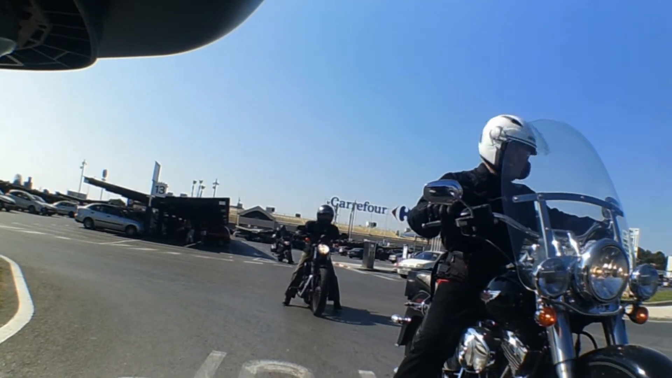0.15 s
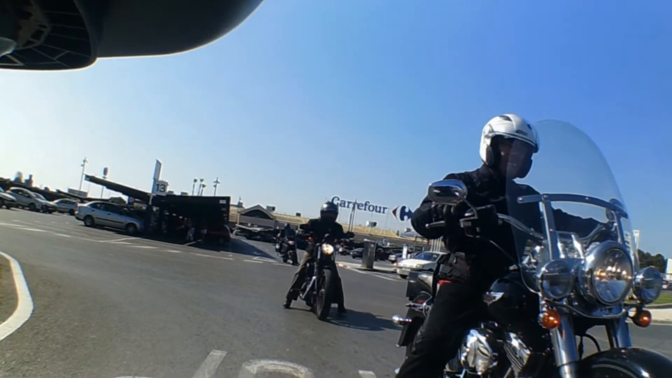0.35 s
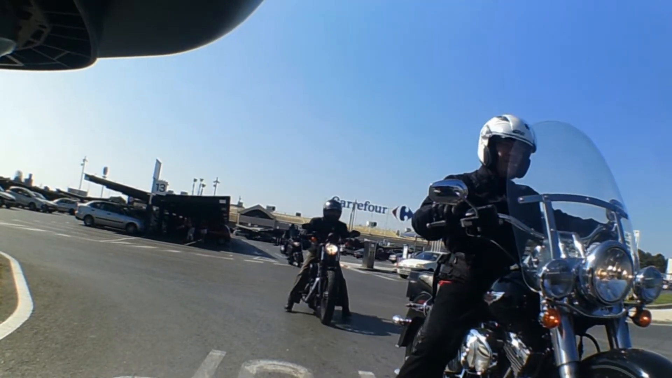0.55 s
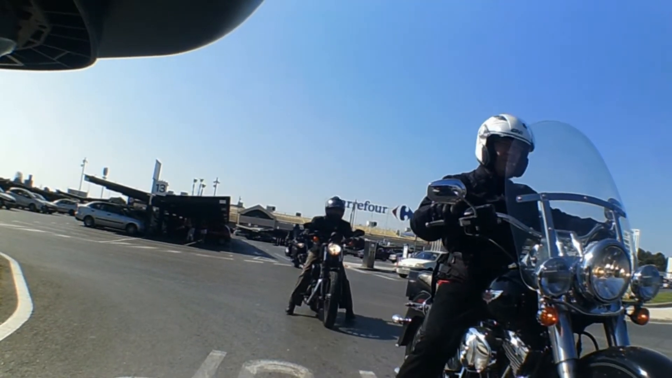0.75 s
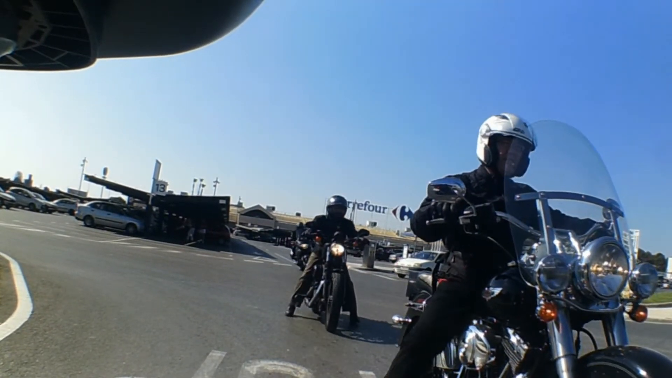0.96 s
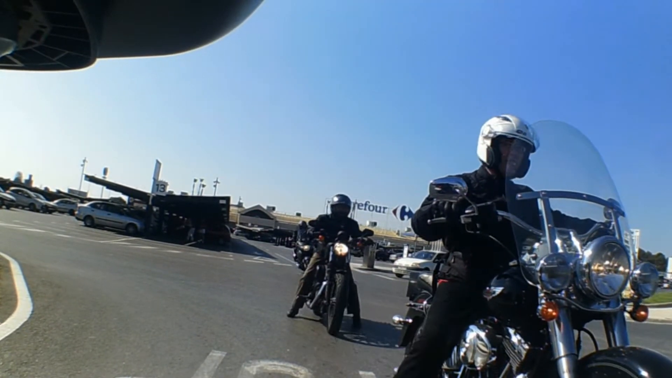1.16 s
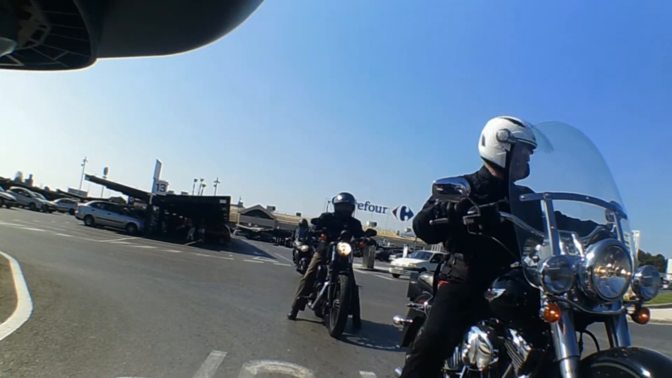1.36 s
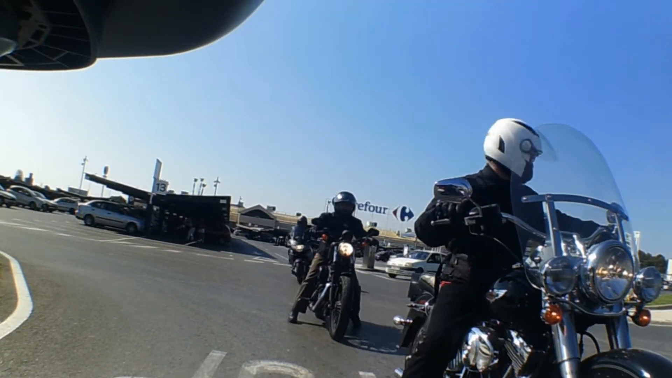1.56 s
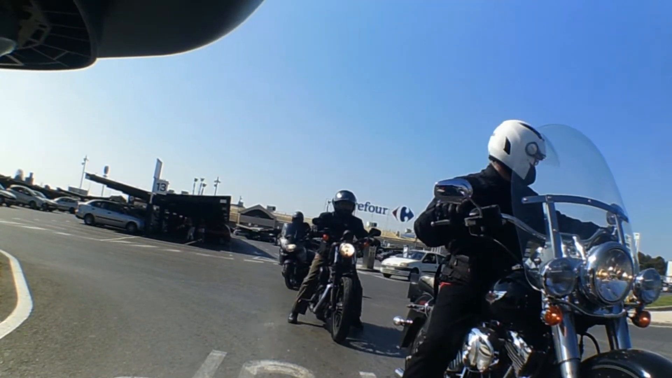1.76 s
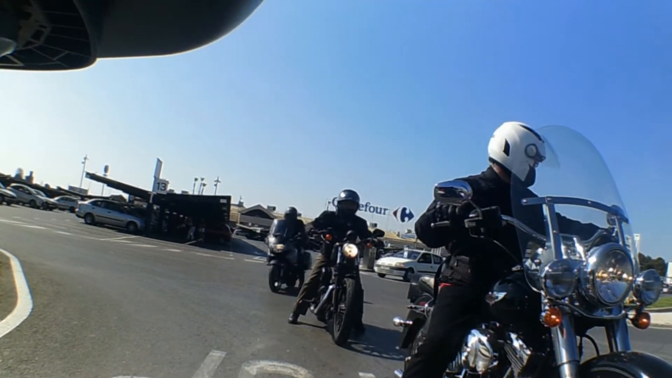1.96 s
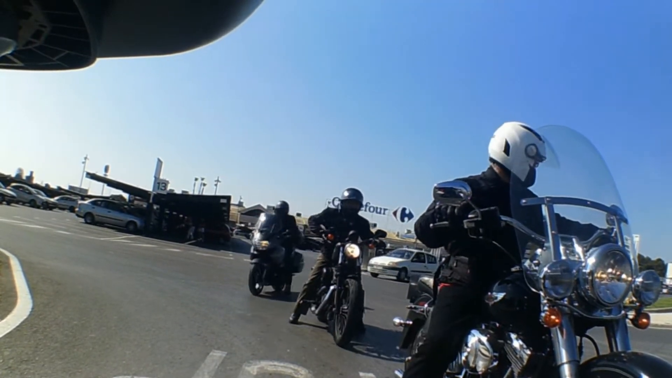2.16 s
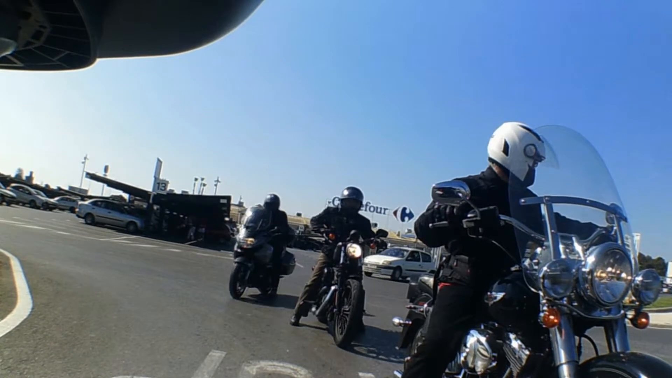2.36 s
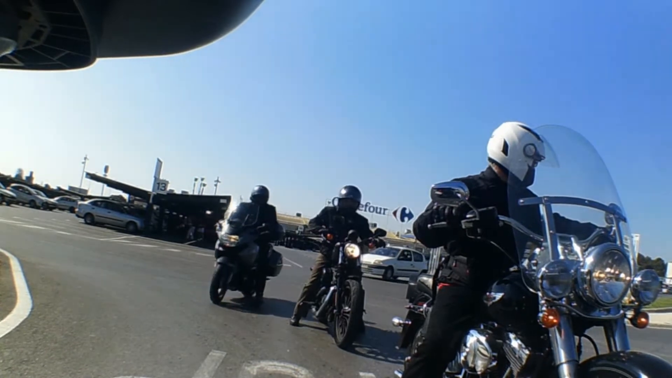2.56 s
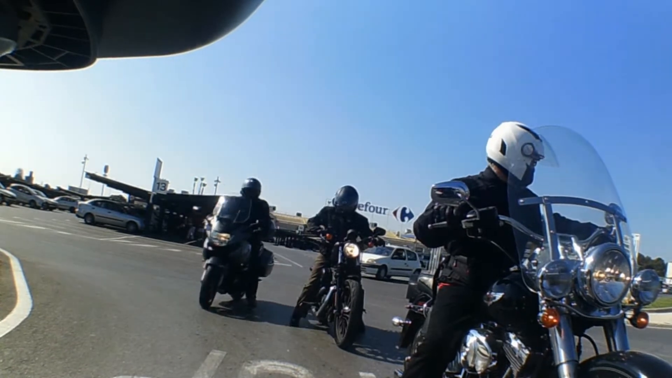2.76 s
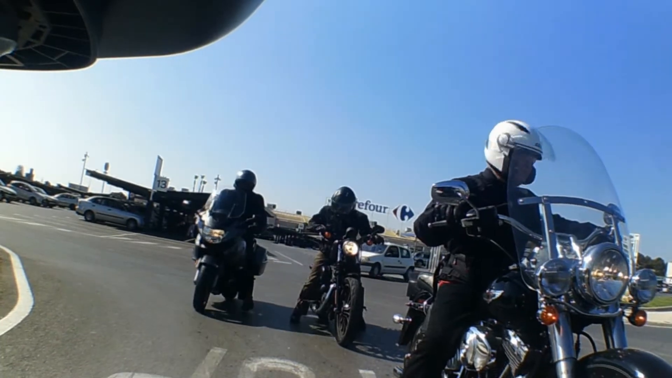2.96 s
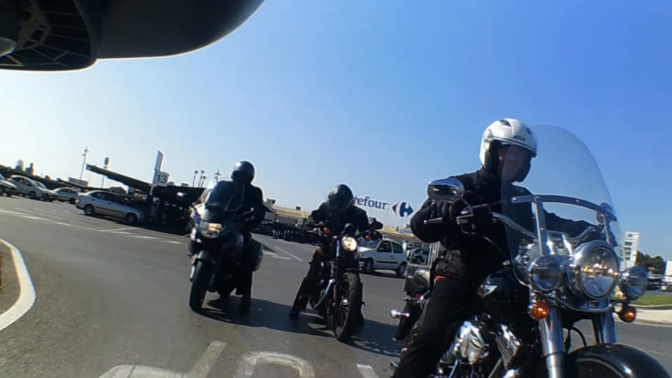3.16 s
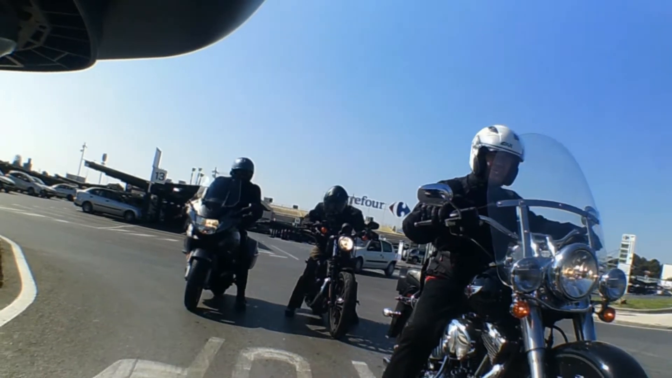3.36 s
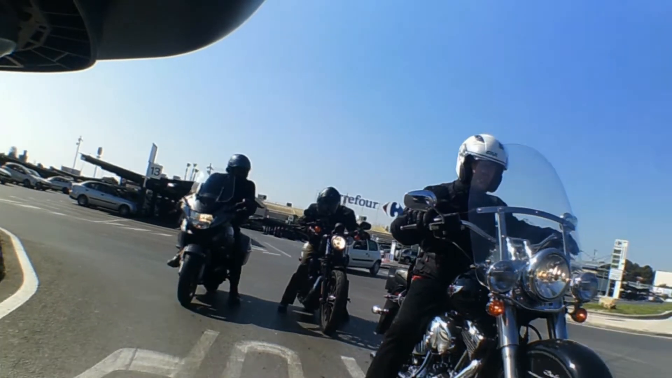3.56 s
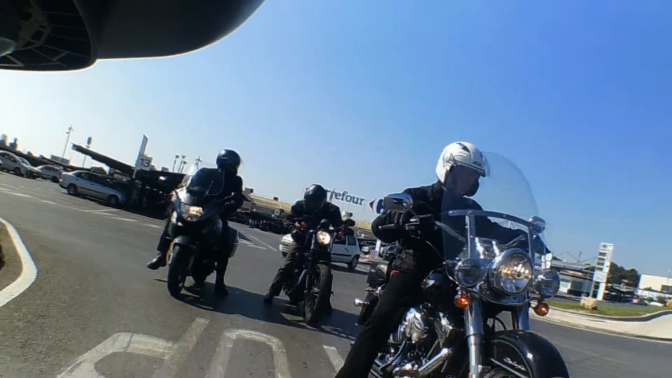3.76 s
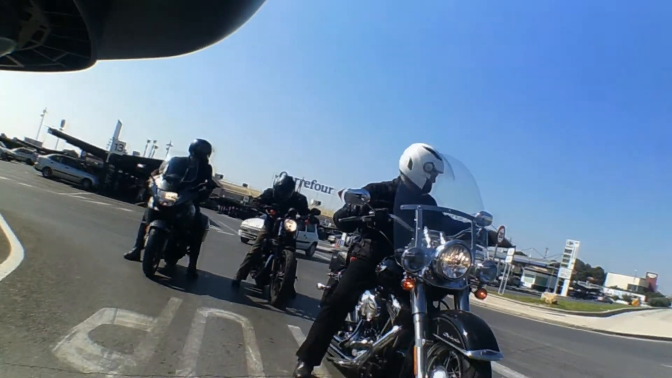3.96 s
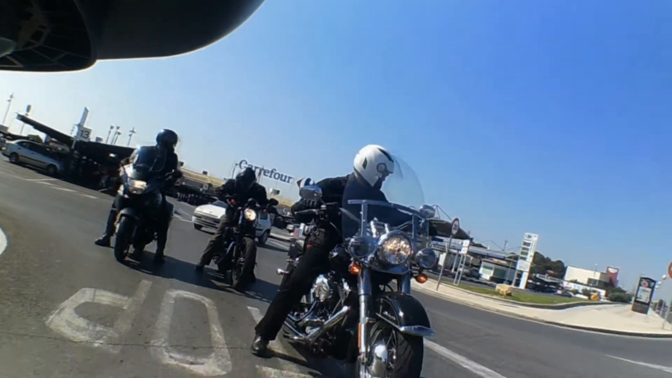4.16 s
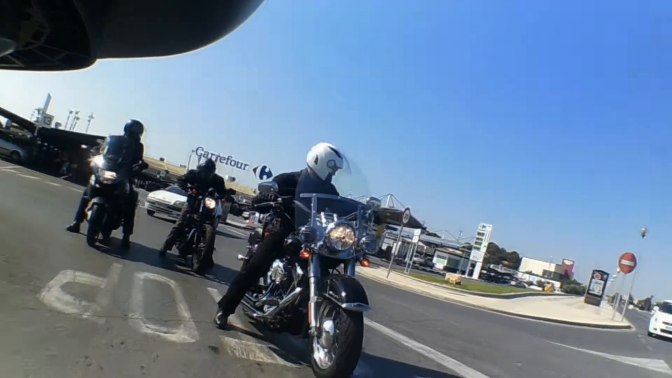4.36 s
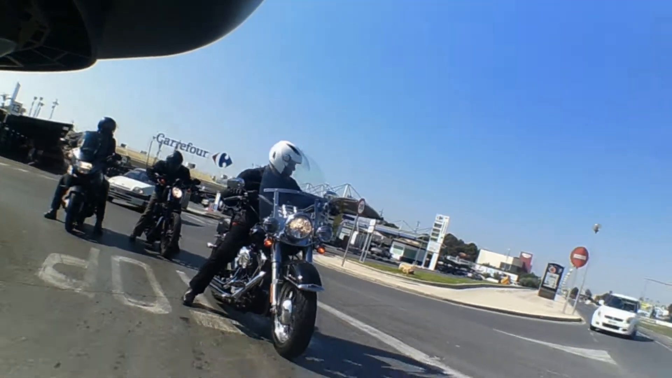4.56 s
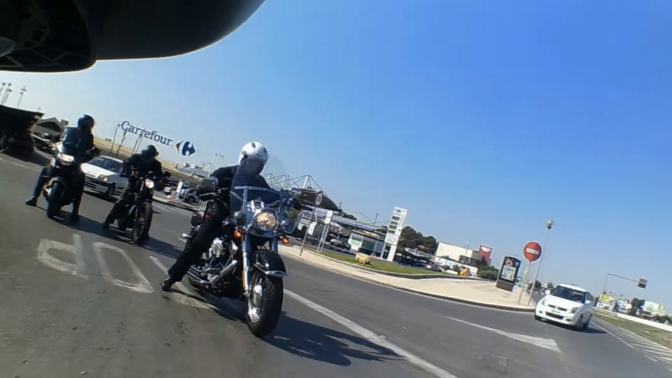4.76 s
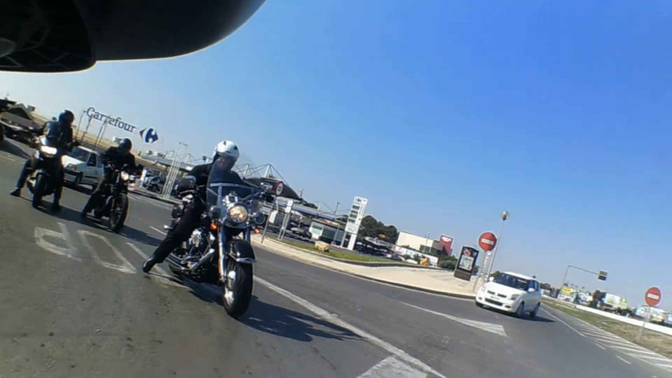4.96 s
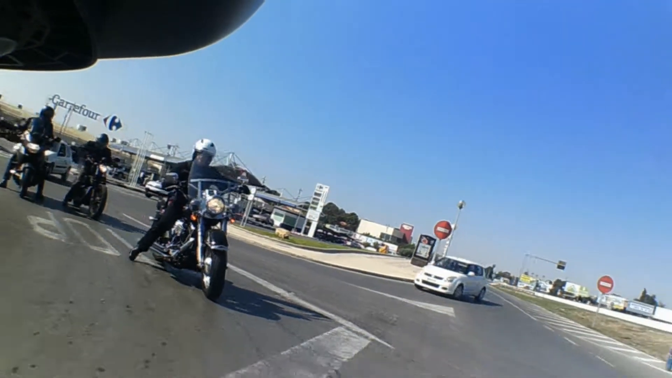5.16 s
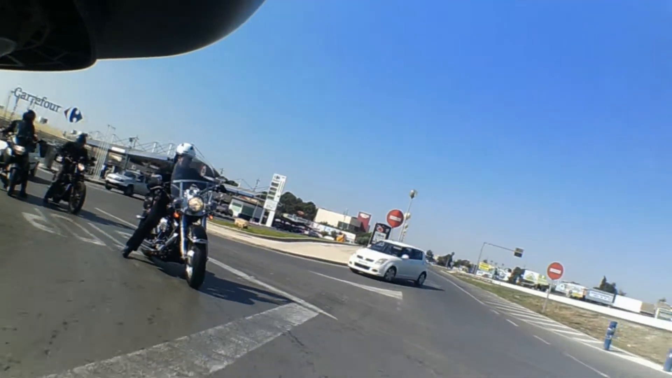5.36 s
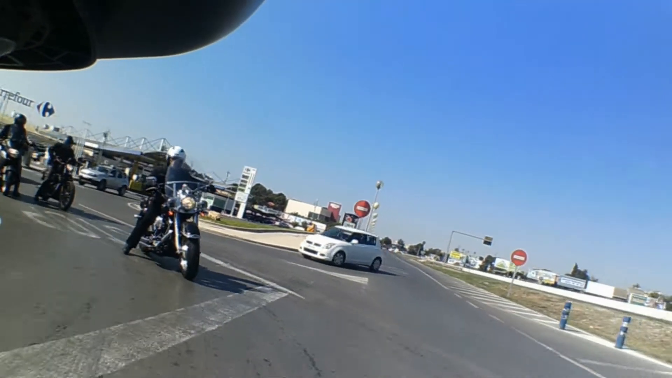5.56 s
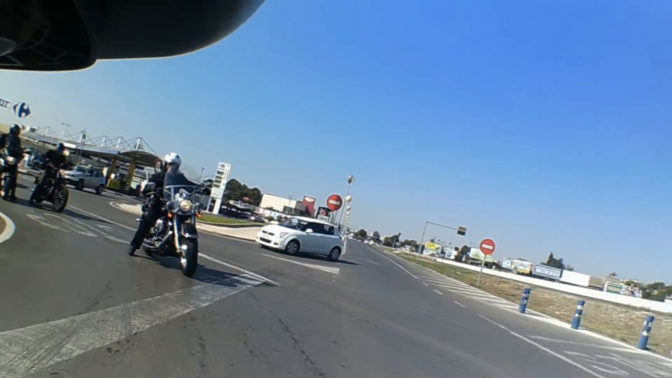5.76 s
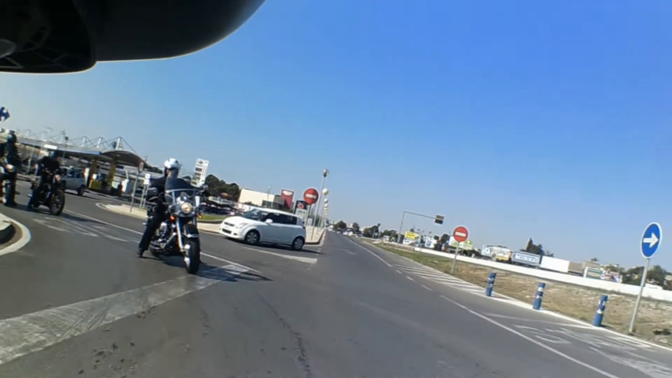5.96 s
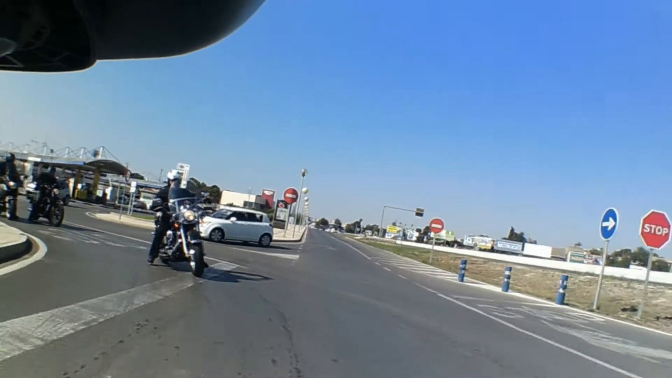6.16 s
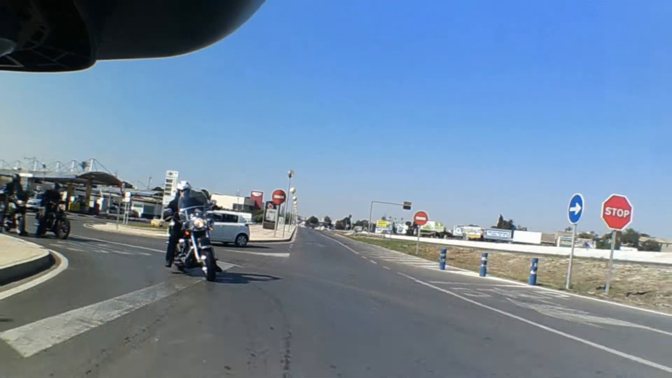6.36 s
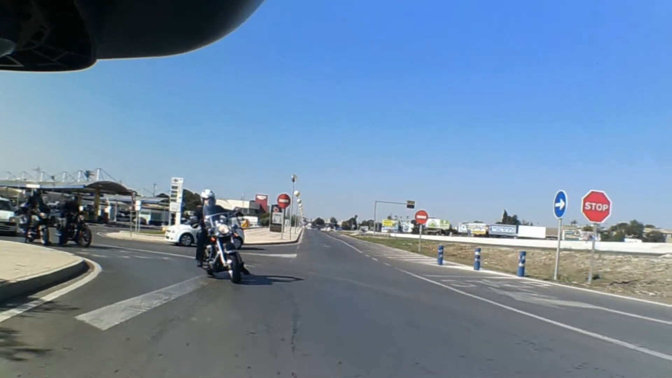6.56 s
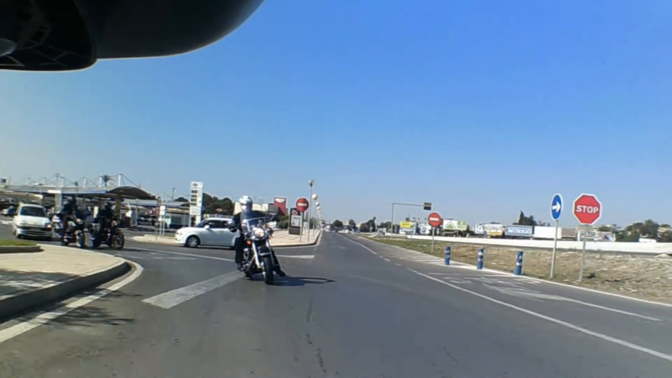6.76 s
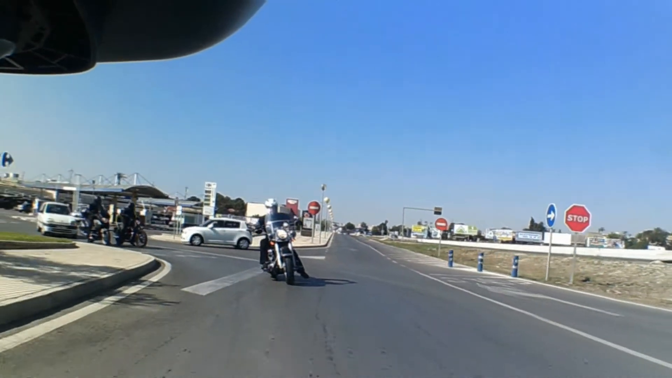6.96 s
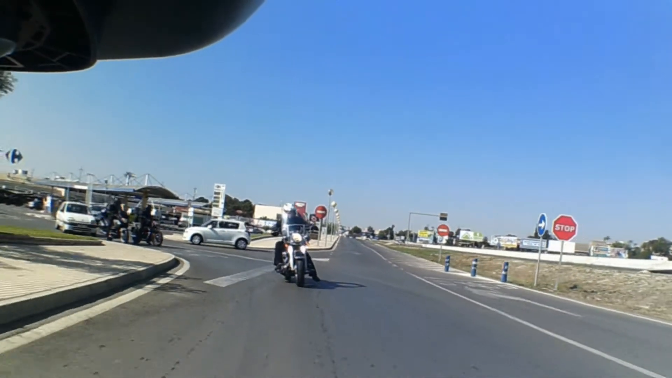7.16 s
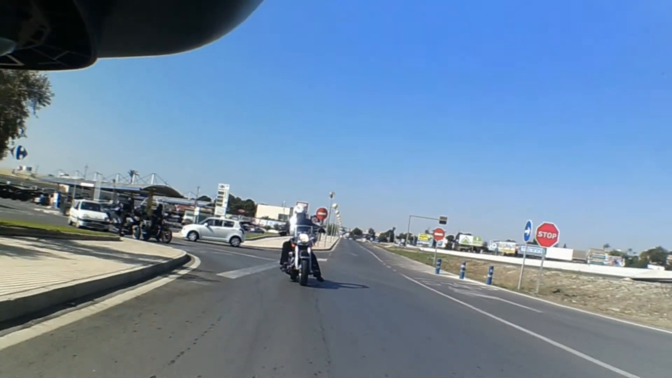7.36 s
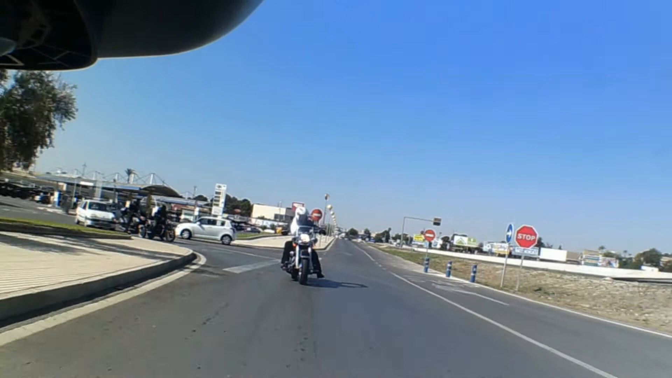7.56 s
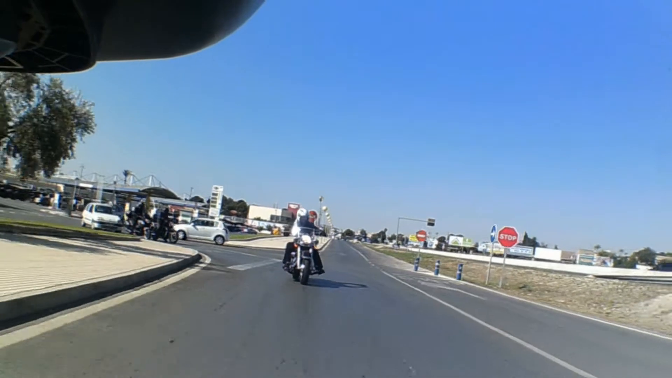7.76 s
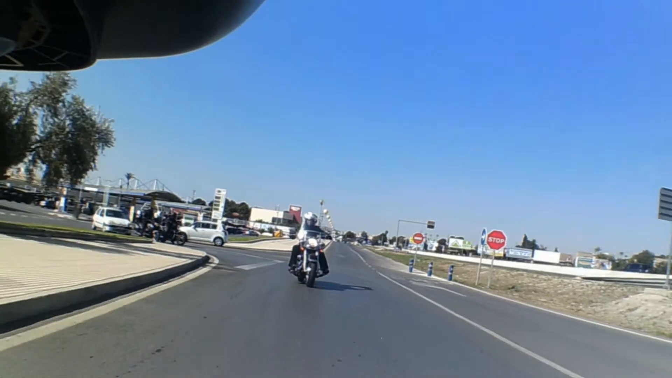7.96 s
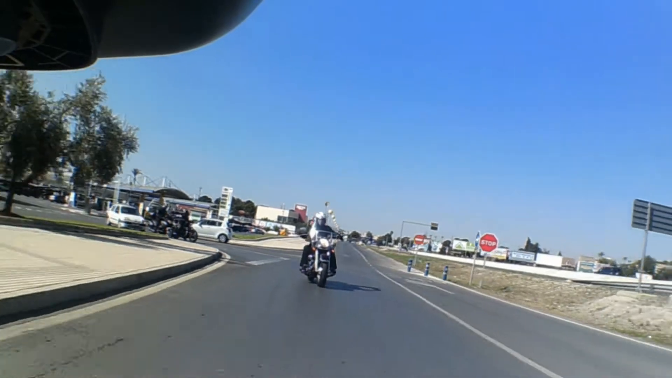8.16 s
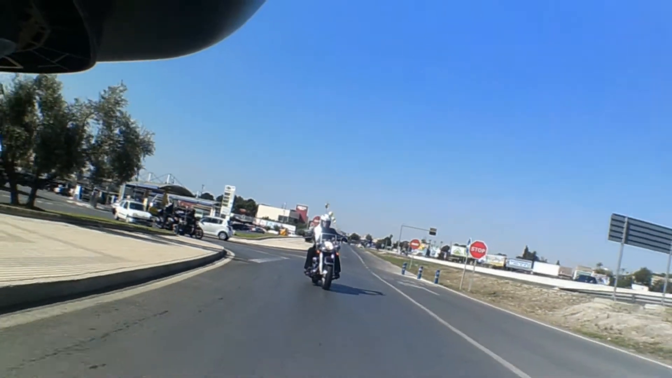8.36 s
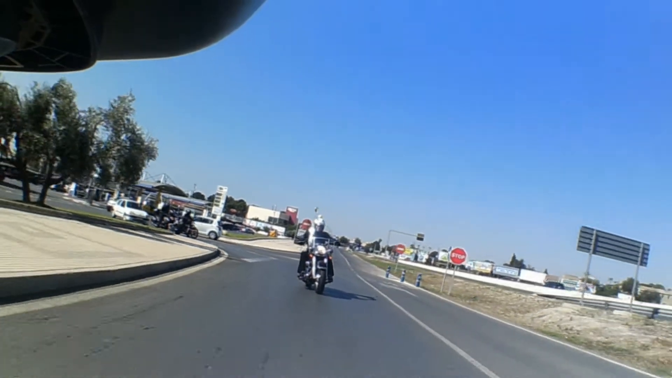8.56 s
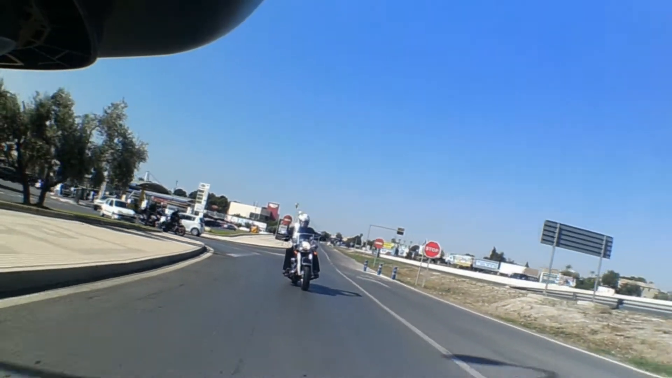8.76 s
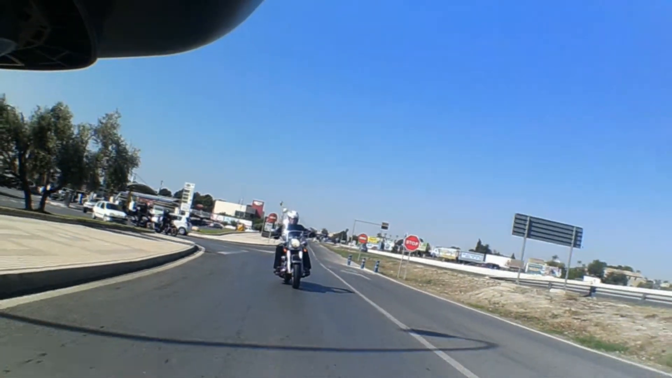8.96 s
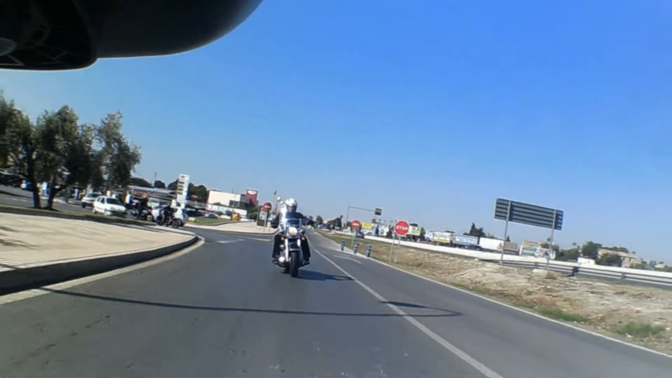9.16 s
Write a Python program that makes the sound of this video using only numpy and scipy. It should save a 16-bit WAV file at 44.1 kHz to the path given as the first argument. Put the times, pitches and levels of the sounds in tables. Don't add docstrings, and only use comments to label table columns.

```python
import sys
import numpy as np
from scipy import signal
from scipy.fft import rfft, irfft, next_fast_len
from scipy.io import wavfile
from scipy.ndimage import uniform_filter1d, map_coordinates

SR = 44100
rng = np.random.default_rng(int(sys.argv[2]) if len(sys.argv) > 2 else 0)


def log_audio(samples):
    frames = np.atleast_2d(samples).T
    limited = np.clip(frames, -1, 1)
    pcm = np.round(limited * 32767).astype(np.int16)
    wavfile.write(sys.argv[1], SR, pcm)


def how_loud(loudness_db):
    steps = np.asarray(loudness_db, float) / 20
    return 10 ** steps


N = 410130

WAITING_CYCLES_PER_S, WAITING_DB, WAITING_M = 8.05, -36, 2.4
LEAVE_S, LEAVE_M_PER_S = 3.2, 6
# time in [s], engine cycles per second in [1/s], level in [dB]
FOLLOWING = [(2.7, 9.9, -36), (3.3, 13.4, -27.5), (3.9, 12.6, -23.5), (4.2, 12.9, -23.5),
             (4.78, 14.6, -22.5), (5.05, 15.3, -25), (5.48, 16.6, -25.5), (5.7, 14.4, -25),
             (6.65, 12.6, -36), (7.2, 12.7, -31.5), (9.03, 20.3, -27.5), (9.3, 21, -33)]
# centre in [Hz], width in [Hz], level in [dB]
FAR_PIPE = [(90, 24, 0), (170, 35, -5), (290, 45, -13)]
# frequency in [Hz], level in [dB]
FAR_WALL = [(15, -34), (60, -18), (700, -30), (3000, -55)]

# time in [s], firings per second in [1/s]
SPEED = [(2.65, 19.5), (3.05, 32.43), (3.3, 29.76), (3.9, 26.93), (4.4, 22.36), (4.7, 21.29), (4.9, 22.34),
         (5.5, 28.97), (5.9, 32.5), (6.3, 35.84), (6.9, 39.45), (7.51, 43.2), (7.8, 29.49), (8.11, 22.13),
         (8.3, 20.6), (8.75, 19.9), (9.12, 33.18), (9.3, 32.52)]
# time in [s], exhaust level above idle in [dB]
THROTTLE = [(2.7, 4), (2.85, 4.5), (3.3, 5), (4.2, 7.5), (5.3, 8), (5.65, 5.5), (6.4, 9.5), (7.7, 6.5),
            (8.13, 1.5), (8.8, 3.7), (9.17, 5.5)]
IDLE_PER_S, IDLE_EXHAUST_DB = 20.2, -28.5
PIPE_LAG_S = .033
FIRING_TURN = .72
# centre in [Hz], width in [Hz], level in [dB]
PIPE = [(74, 20, 0), (118, 18, -8), (255, 40, -18), (320, 30, -19), (440, 50, -23), (540, 60, -23)]
# frequency in [Hz], level in [dB]
PIPE_WALL = [(15, -30), (40, -26), (100, -17), (180, -34), (700, -38), (3000, -70)]
# frequency in [Hz], density in [dB per Hz]
RUMBLE = [(15, -14), (40, -9), (80, 0), (130, -9), (350, -19), (480, -11), (1200, -22), (4000, -50)]
RUMBLE_UNDER_DB = -12.5
# time in [s], crack peak in [dB], thump in [dB]
POPS = [(0.3616, -41, -33), (0.5013, -38, -32), (0.7327, -40, -45), (0.9772, -26, -25),
        (1.3209, -38, -36.5), (1.3793, -23, -24), (1.4546, -42, -32.5), (1.794, -22, -23.5),
        (2.2024, -25, -24.5), (2.2894, -39, -31), (2.6094, -42, -21.5)]

CLATTER_DB, CLATTER_DB_PER_OCTAVE, CLATTER_THROTTLE_SHARE = -36.5, 8.5, 0.033
HISS_DB, HISS_DB_PER_OCTAVE, HISS_THROTTLE_SHARE = -49, 7.5, 0.27
# clutch let out in [s], gears take load in [s], clutch home in [s],
# clutch pulled in [s], tooth contacts in [per firing]
PULLS = [
    (3.2, 4.25, 5.59, 7.5, 13.81),
    (8.75, 9.1, 9.4, 9.9, 16.3),
]
SLIP_DB, SLIP_RISE_S, SLIP_FALL_S, LOCKED_DB = -0.47, 1.56, 0.43, -14.5
MOAN_ORDER, MOAN_DB, MOAN_S = 26, -22.5, 0.64
# time in [s], peak in [dB], share above 2 kHz in [dB]
KNOCKS = [(7.5928, -3, -17), (7.644, -1, 4.5), (7.659, 4, -1.5), (7.6724, -4, -9), (7.73, -8, -12),
          (7.7624, -21, 4), (7.7943, -6, 3), (7.8366, -11, 2), (7.857, -3, 1.5), (7.8714, -12, -5),
          (7.9539, 1, 0), (7.9712, -12, 1), (8.038, -8, -1), (8.0599, -8.5, 6.5), (8.106, -7, -14),
          (8.2134, -14.5, -3), (8.3761, -10, -4), (8.3884, -17, 0), (8.426, -11.5, 2), (8.514, -13, 0),
          (8.999, -5.5, -16), (9.0279, -9, -23), (9.093, -12, 6.5), (9.179, -9, 5), (9.196, -5, 5),
          (9.238, -8, -10), (9.2892, -21, -22)]
MESH_DB, LET_GO_S = -25, 0.061
# multiple of the tooth rate in [1], level in [dB]
MESH_OVERTONES = [(2, -6.5), (4, 3), (5, 0), (6.001, -2), (7, -5.5), (8, -18), (9, -24)]
# frequency in [Hz], level in [dB]
WHINE = [(1100, -29), (1240, -21), (1330, 1.3), (1510, 7), (1650, 8), (1790, 5.5)]
# multiple of the tooth rate in [1], level in [dB]
SHAFT_HUMS = [(1, -7.5), (1.073, -13.5), (1.815, -6)]
HUMS_WAKE_PER_S = [30.4, 35.7]
# speed in [firings per s], depth in [1]
BACKLASH = [(34.5, .85), (36.3, .2)]
# centre in [Hz], width in [Hz], level in [dB]
CASE = [(507, 210, -14), (1499.6, 70.7, 4.5), (2216, 18, -12.5), (2414, 60, -6.5), (2713, 100, -11),
        (3527, 100, -12.5), (3818, 210, -12), (4696, 240, -16.5), (5578, 344, -23), (5380, 25, -40.5),
        (6914, 224, -26), (9430, 120, -41), (11130, 630, -37)]
# centre in [Hz], width in [Hz], level in [dB]
CASE_EXTRA = [(836, 145, -11.5), (2895, 55, -11.5), (14500, 150, -62)]
# frequency in [Hz], level in [dB]
CASE_WALL = [(100, -15), (370, -22), (1100, -15), (1900, -12), (3250, -30), (5000, -26.5), (6300, -52),
             (7800, -42.5), (10000, -42), (12300, -44.5), (13500, -58), (16000, -50)]


def noise():
    return rng.standard_normal(N)


def butter(x, order, hz, kind):
    return signal.sosfilt(signal.butter(order, hz, kind, fs=SR, output="sos"), x)


def rms_one(x):
    return x / np.sqrt(np.mean(x ** 2) + 1e-20)


def evened(x, window_s):
    return x / np.sqrt(uniform_filter1d(x ** 2, int(window_s * SR), mode="reflect") + 1e-20)


def in_time(rows):
    s, *columns = np.transpose(rows)
    return [np.interp(np.arange(N) / SR, s, c) for c in columns]


def ramp(start_s, length_s):
    return np.clip((np.arange(N) / SR - start_s) / length_s, 0, 1)


def drift(rate):
    knots = int(N / SR * rate) + 3
    return map_coordinates(rng.standard_normal(400), [np.arange(N) / N * (knots - 1)], order=3)


def burst(times_s, gains, rise_s, fall_s):
    out = np.zeros(N)
    np.add.at(out, (np.array(times_s) * SR).astype(int), gains)
    for tau in (rise_s, fall_s):
        out = signal.lfilter([1], [1, -np.exp(-1 / (tau * SR))], out + 1e-18)
    return out / (rise_s * SR)


def coloured(x, peaks, wall):
    size = next_fast_len(N + SR // 2)
    hz = np.arange(size // 2 + 1) * SR / size + 1e-3
    wall_hz, wall_db = np.transpose(wall)
    power = how_loud(2 * np.interp(np.log(hz), np.log(wall_hz), wall_db))
    for centre_hz, width_hz, db in peaks:
        power = power + how_loud(2 * db) / (1 + ((hz - centre_hz) / width_hz) ** 2) ** 2
    cepstrum = irfft(np.log(power), size)
    cepstrum[0] /= 2
    cepstrum[size // 2:] = 0
    return irfft(rfft(x, size) * np.exp(rfft(cepstrum)), size)[:N]


def chambers(x, lag_s, gain):
    size = next_fast_len(N + SR // 2)
    lag = np.exp(-2j * np.pi * np.arange(size // 2 + 1) * SR / size * lag_s)
    return irfft(rfft(x, size) * (lag - gain) / (1 - gain * lag), size)[:N]


def firings(cycles, second_at, uneven, late_s):
    out = np.zeros(N)
    for offset, bias in ((0, 1), (second_at, -1)):
        at = np.flatnonzero(np.diff(np.floor(cycles - offset)) > 0)
        chance = rng.standard_normal((400, 2))[:len(at)]
        late = (late_s * SR * uneven[at] * chance[:, 0]).astype(int)
        strength = 1 + uneven[at] * (0.13 * bias + 0.6 * chance[:, 1])
        np.add.at(out, np.clip(at + late, 0, N - 1), strength)
    return out


def narrow_twin(cycles_per_s, level_db, uneven):
    pulses = firings(np.cumsum(cycles_per_s) / SR, 315 / 720, np.full(N, uneven), late_s=.003)
    tone = chambers(coloured(pulses, FAR_PIPE, FAR_WALL), lag_s=.027, gain=0.51)
    return how_loud(level_db) * evened(tone, window_s=0.51)


def waiting_bike():
    away_m = WAITING_M + LEAVE_M_PER_S * np.maximum(np.arange(N) / SR - LEAVE_S, 0)
    return WAITING_M / away_m * narrow_twin(np.full(N, WAITING_CYCLES_PER_S), WAITING_DB, uneven=.4)


def following_bike():
    return narrow_twin(*in_time(FOLLOWING), uneven=.06)


def pops():
    s, crack_db, thump_db = np.transpose(POPS)
    crack = burst(s, how_loud(crack_db - 4), rise_s=.0006, fall_s=.003) * noise()
    crack = butter(crack, 2, [9500, 15000], "band")
    thump = burst(s - .02, how_loud(thump_db + 15.0), rise_s=0.0077, fall_s=0.016) * noise()
    thump = butter(thump, 2, 1500, "low")
    peaks = [(85.7, 18.0, 23), (244, 42, 10.4)]
    wall = [(30, 19), (300, -0.5), (900, 2.5), (3000, -24.0)]
    return crack + coloured(thump, peaks, wall)


def exhaust(turns, per_s, throttle_db):
    uneven = np.interp(per_s, [20, 30], [.1, .025])
    pulses = firings((turns + PIPE_LAG_S * per_s - FIRING_TURN) / 2, .5, uneven, late_s=.004)
    tone = chambers(coloured(pulses, PIPE, PIPE_WALL), lag_s=.021, gain=0.36)
    tone = chambers(tone, lag_s=.0083, gain=.55)
    bark = butter(tone, 2, [95, 480], "band")
    tone = tone + np.interp(per_s, [20, 32, 40], [-.4, .1, .8]) * bark
    rumble = rms_one(coloured(noise(), [], RUMBLE))
    return how_loud(IDLE_EXHAUST_DB + throttle_db) * (evened(tone, window_s=.4) + how_loud(RUMBLE_UNDER_DB) * rumble)


def clatter(turns, per_s, throttle_db, strain):
    octaves = np.log2(per_s / IDLE_PER_S)
    level_db = CLATTER_DB + CLATTER_DB_PER_OCTAVE * octaves + CLATTER_THROTTLE_SHARE * throttle_db
    hiss_db = HISS_DB + HISS_DB_PER_OCTAVE * octaves + HISS_THROTTLE_SHARE * throttle_db
    swell = 0.14 * np.cos(2 * np.pi * (turns - .9)) + 0.13 * np.cos(4 * np.pi * turns + 1.86)
    body = np.exp(swell + 0.039 * drift(25)) * noise()
    pulse = (0.092 + 0.17 * strain) * np.cos(2 * np.pi * (turns - .62))
    hiss = np.exp(pulse + 0.058 * drift(15)) * noise()
    low = butter(body, 2, 7500, "low")
    high = butter(hiss, 2, 7500, "high")
    return how_loud(level_db + 25.5) * low + how_loud(hiss_db + 44.5) * high


def drive_line():
    slip, load, teeth = np.zeros((3, N))
    for out_s, load_s, home_s, pulled_s, contacts in PULLS:
        held = 1 - ramp(pulled_s, LET_GO_S)
        settling = np.exp(-np.maximum(np.arange(N) / SR - home_s, 0) / SLIP_FALL_S)
        slip += ramp(out_s, SLIP_RISE_S) * held * np.maximum(how_loud(SLIP_DB) * settling, how_loud(LOCKED_DB))
        load += ramp(load_s, home_s - load_s) * held
        teeth[int(out_s * SR):] = contacts
    return slip, load, teeth


def rasp(turns, slip, load):
    throb = 0.21 * np.cos(2 * np.pi * (turns + 0.33))
    friction = np.exp(throb + 0.064 * drift(30)) * noise()
    dull = butter(friction, 2, [550, 2360], "band")
    bright = butter(friction, 2, [1750, 2490], "band")
    return slip * (dull + 1.29 * load * bright)


def moan(turns):
    start_s = PULLS[0][0]
    bite = ramp(start_s, 0.14) - ramp(start_s + MOAN_S, 0.16)
    return how_loud(MOAN_DB + 2.1 * drift(25)) * bite * np.sin(2 * np.pi * MOAN_ORDER * turns + 0.93 * drift(35))


def knocks():
    s, peak_db, bright_db = np.transpose(KNOCKS)
    dull = burst(s, how_loud(peak_db + 11.0), rise_s=0.00079, fall_s=0.0033) * noise()
    bright = burst(s, how_loud(peak_db + bright_db + 9.0), rise_s=0.0034, fall_s=0.0024) * noise()
    return butter(dull, 2, 1000, "high"), butter(bright, 4, [1250, 3000], "band")


def gears(turns, per_s, engaged, teeth):
    third_db = np.interp(3 * teeth * per_s, *np.transpose(WHINE))
    crank = 2 * np.pi * (turns + .58)
    phase = 2 * np.pi * np.cumsum(teeth * per_s) / SR
    hum_phase = phase + 0.18 * np.sin(crank)
    hums = sum(how_loud(db + 4.2 * drift(12)) * np.sin(k * hum_phase) for k, db in SHAFT_HUMS)
    phase = phase + 0.46 * np.sin(crank + 1.14) + 0.1 * np.sin(2 * crank + 0.22) + 0.49 * drift(30)
    backlash = np.interp(per_s, *np.transpose(BACKLASH))
    load = 1 + backlash * np.cos(crank) + 0.14 * np.cos(2 * crank + 0.67)
    tones = sum(how_loud(db + 1.4 * drift(40)) * np.sin(k * phase) for k, db in MESH_OVERTONES)
    tones = tones + how_loud(third_db + 1.1 * drift(22)) * np.sin(3 * phase)
    awake = np.interp(per_s, HUMS_WAKE_PER_S, [0, 1])
    return how_loud(MESH_DB + 10.0) * engaged * (load * tones + awake * hums)


def scene():
    (per_s,), (throttle_db,) = in_time(SPEED), in_time(THROTTLE)
    turns = np.cumsum(per_s) / SR
    slip, load, teeth = drive_line()
    shake, scrape = knocks()
    distant = waiting_bike() + following_bike()
    near = pops() + exhaust(turns, per_s, throttle_db) + scrape
    frame = clatter(turns, per_s, throttle_db, slip) + rasp(turns, slip, load) + moan(turns)
    frame = frame + shake + gears(turns, per_s, load, teeth)
    through_case = coloured(frame, [*CASE, *CASE_EXTRA], CASE_WALL)
    return (distant + near + through_case)[None]


def roll_off(x):
    return signal.sosfilt(signal.butter(12, 15780, fs=SR, output="sos"), x)


def record(dry):
    bent = dry + .62 * np.clip(dry, -.9, 2) ** 2
    bent = butter(bent, 1, 14, "high")
    clipped = np.clip(bent, -1, .96)
    mix = signal.sosfilt(signal.cheby2(12, 60, 15900, fs=SR, output="sos"), clipped)
    return roll_off(mix)


dry = scene()
out = record(dry)
log_audio(out)
```